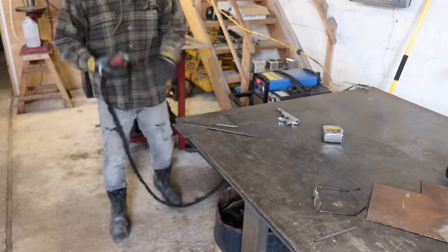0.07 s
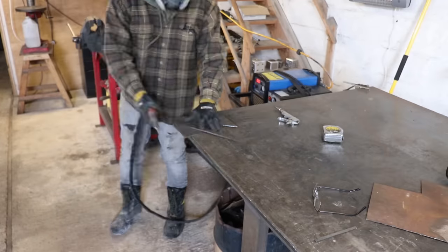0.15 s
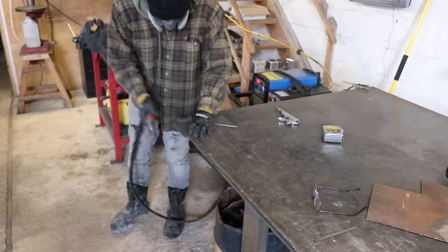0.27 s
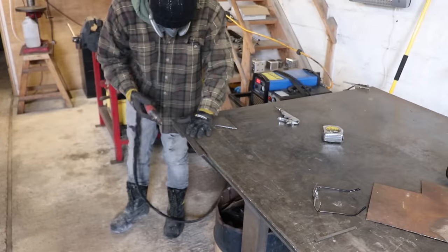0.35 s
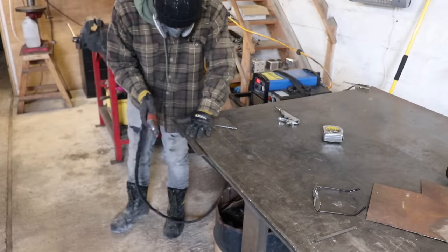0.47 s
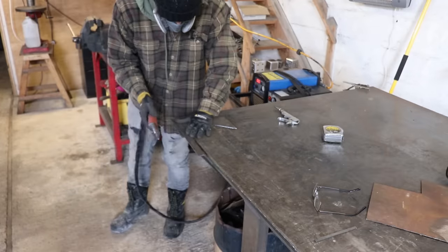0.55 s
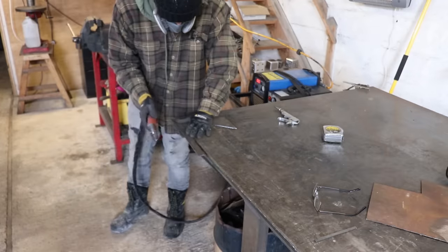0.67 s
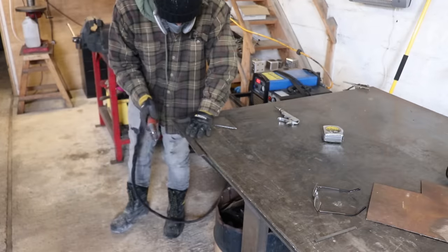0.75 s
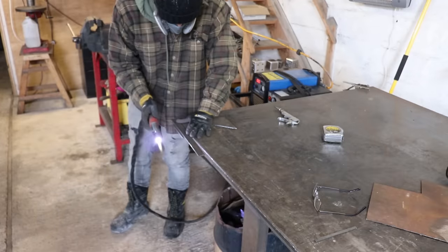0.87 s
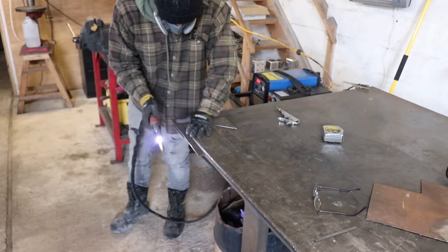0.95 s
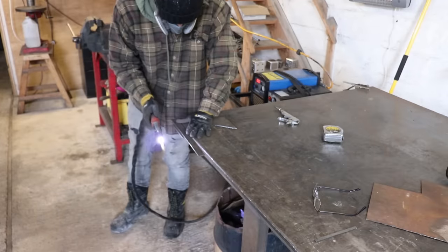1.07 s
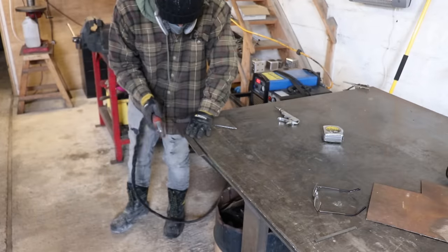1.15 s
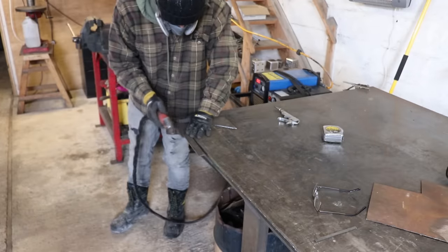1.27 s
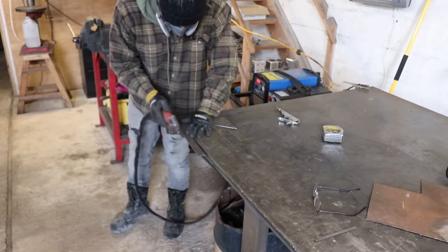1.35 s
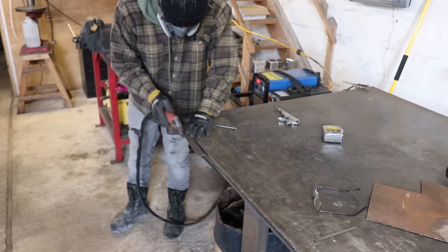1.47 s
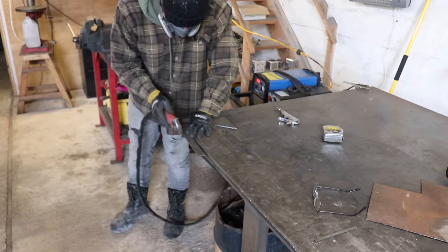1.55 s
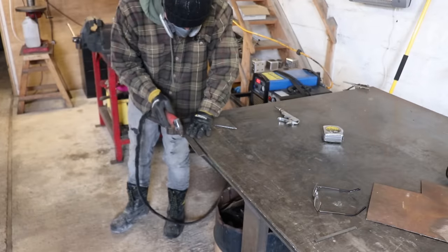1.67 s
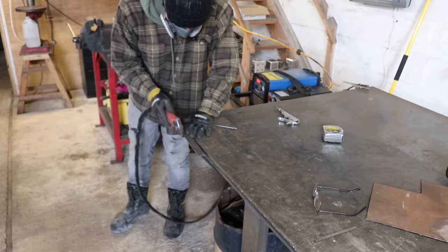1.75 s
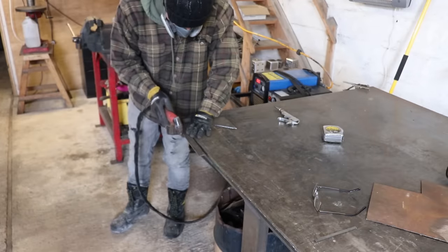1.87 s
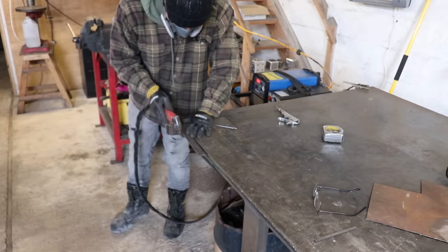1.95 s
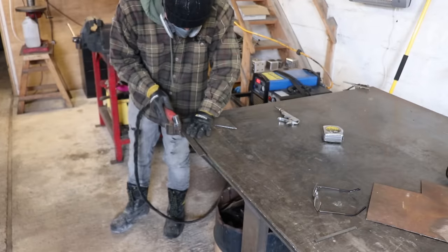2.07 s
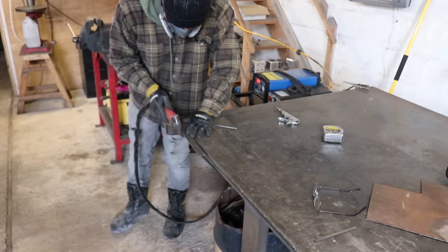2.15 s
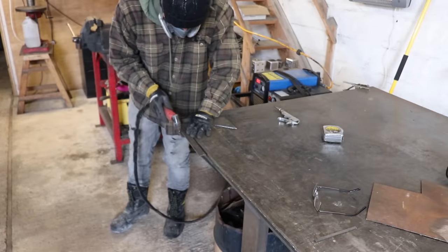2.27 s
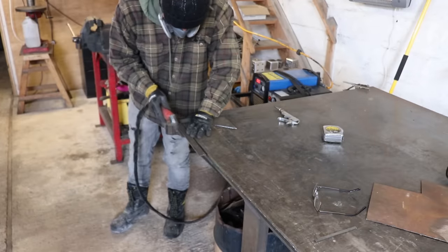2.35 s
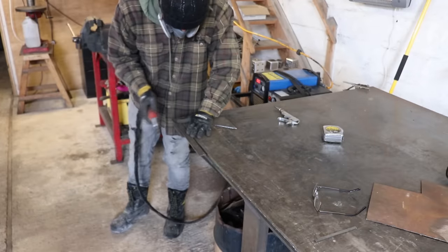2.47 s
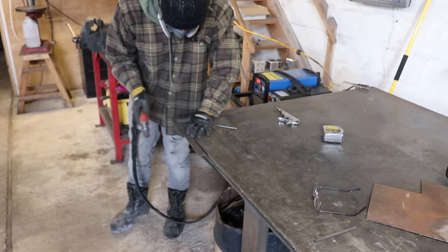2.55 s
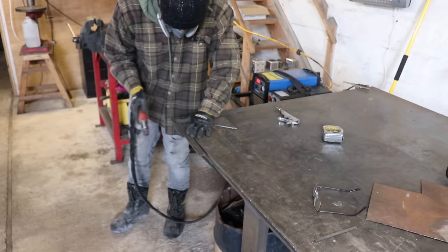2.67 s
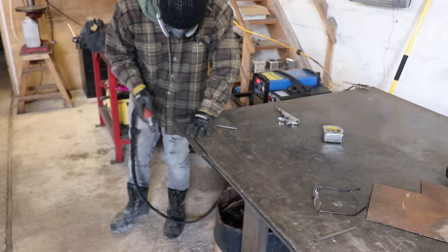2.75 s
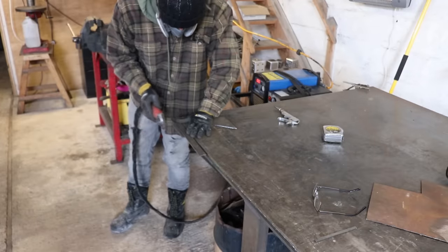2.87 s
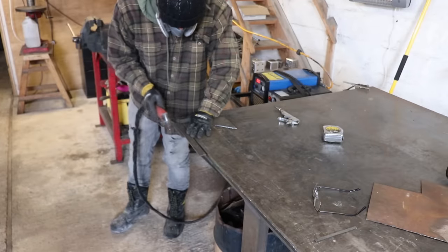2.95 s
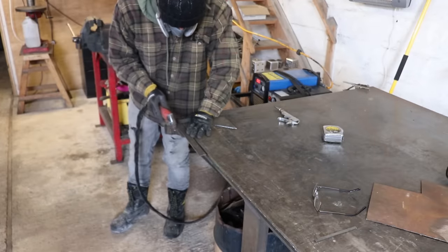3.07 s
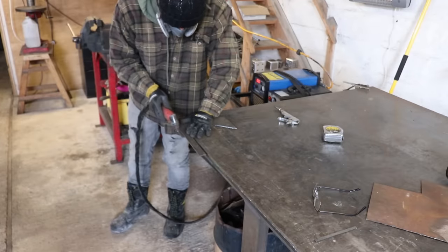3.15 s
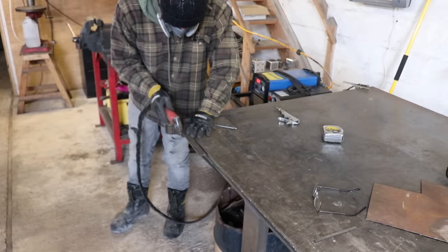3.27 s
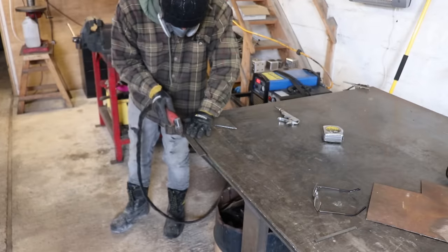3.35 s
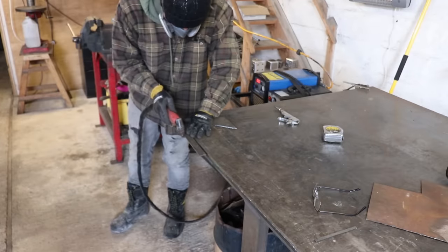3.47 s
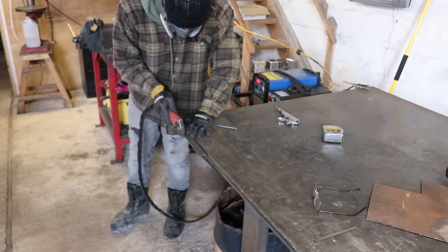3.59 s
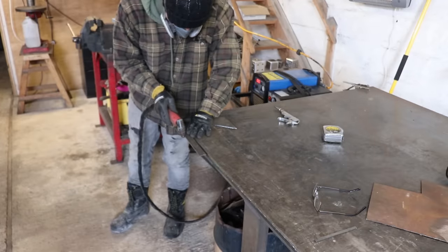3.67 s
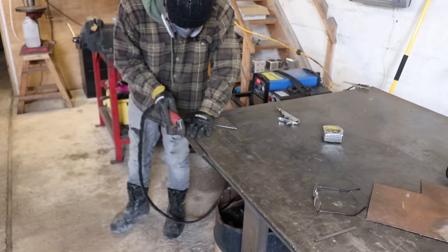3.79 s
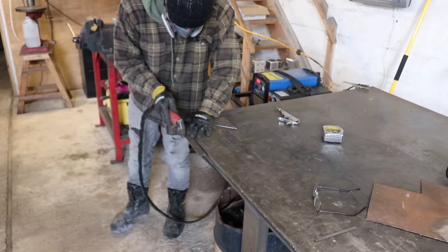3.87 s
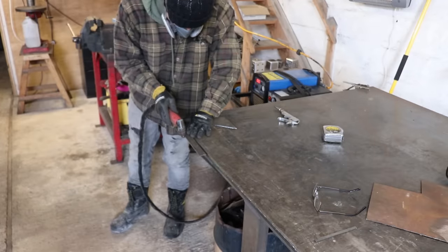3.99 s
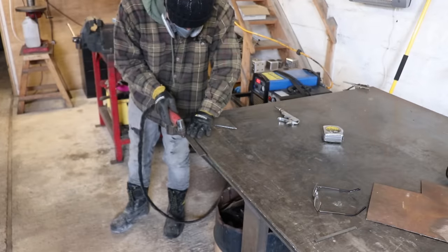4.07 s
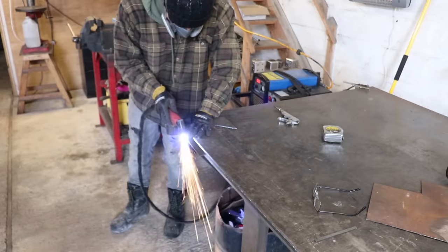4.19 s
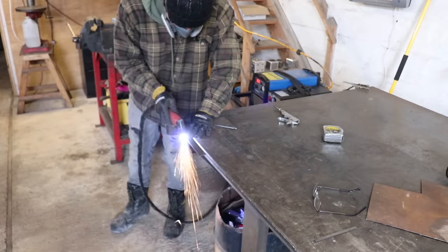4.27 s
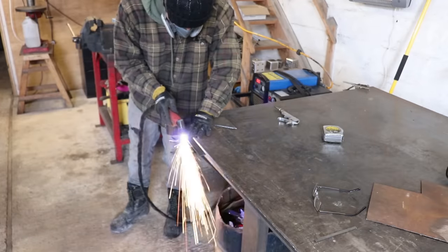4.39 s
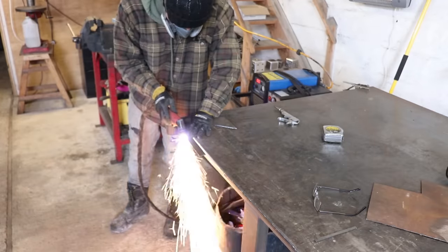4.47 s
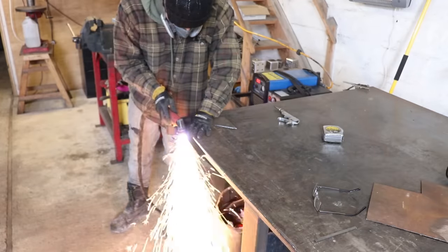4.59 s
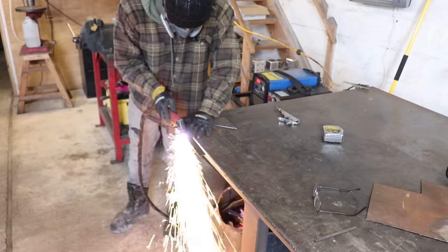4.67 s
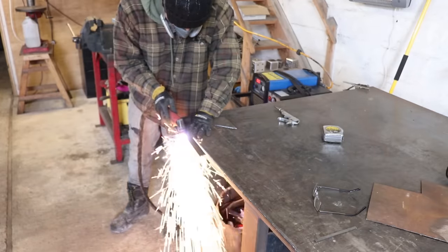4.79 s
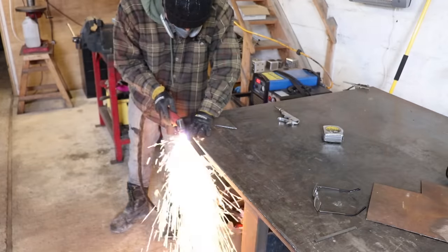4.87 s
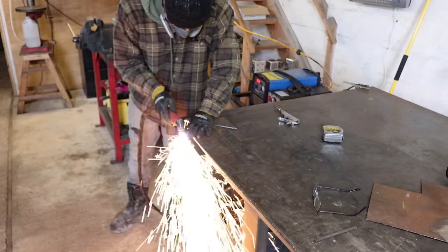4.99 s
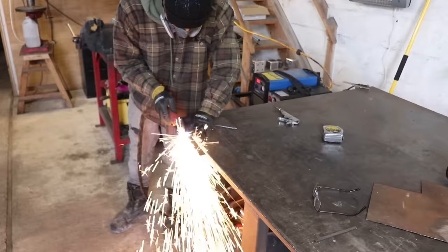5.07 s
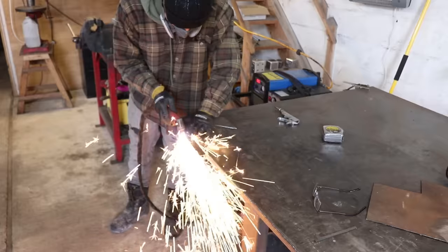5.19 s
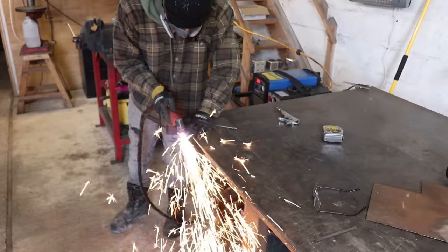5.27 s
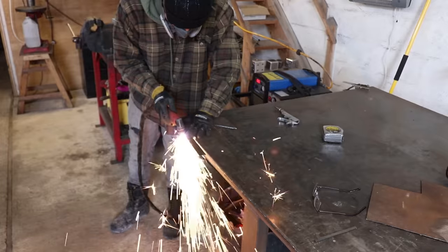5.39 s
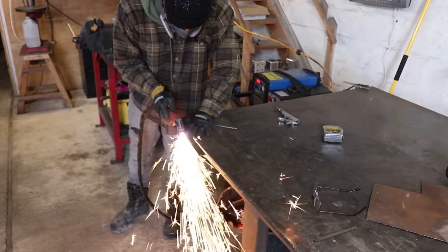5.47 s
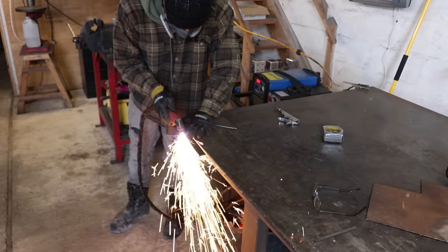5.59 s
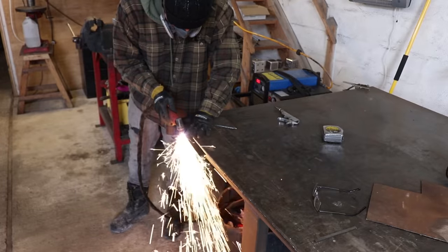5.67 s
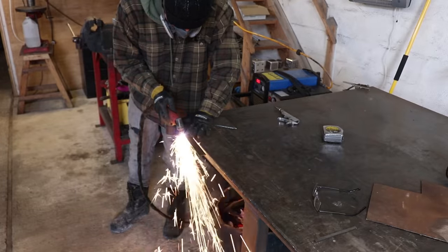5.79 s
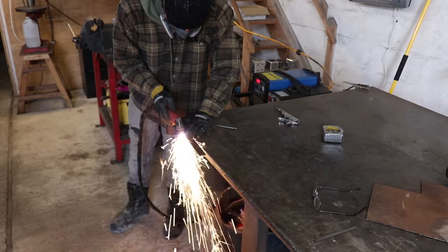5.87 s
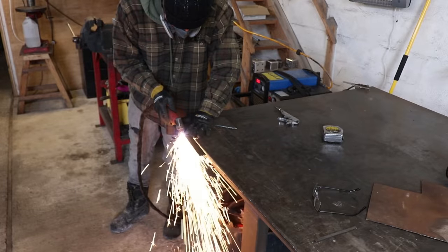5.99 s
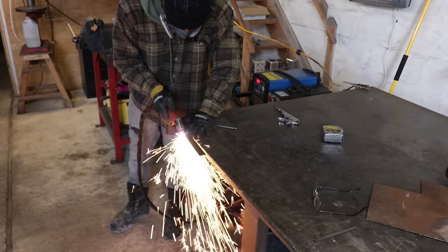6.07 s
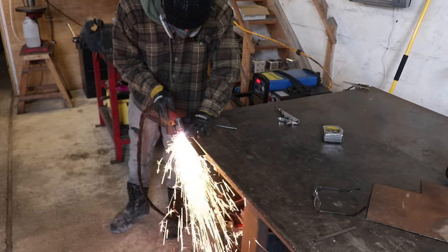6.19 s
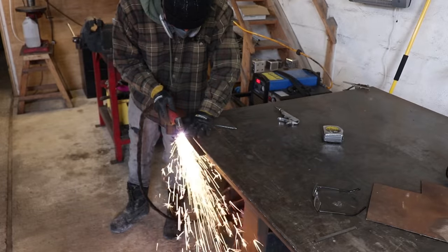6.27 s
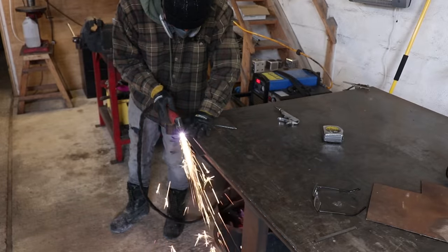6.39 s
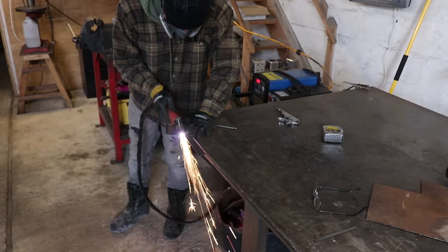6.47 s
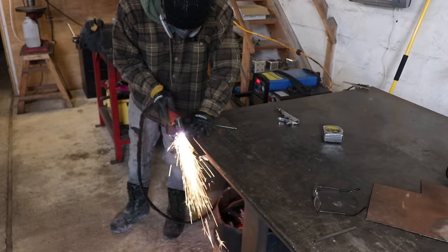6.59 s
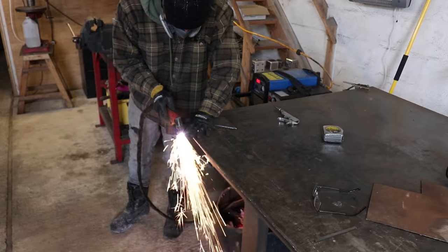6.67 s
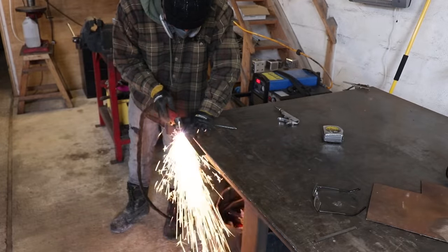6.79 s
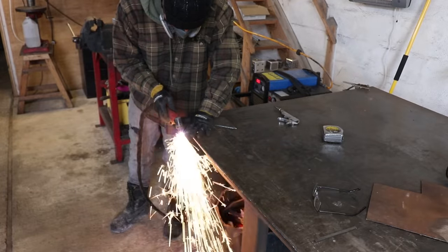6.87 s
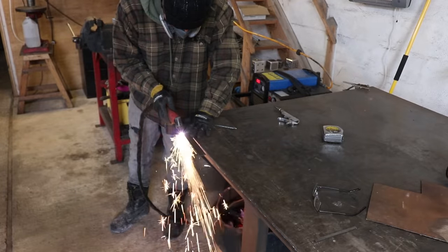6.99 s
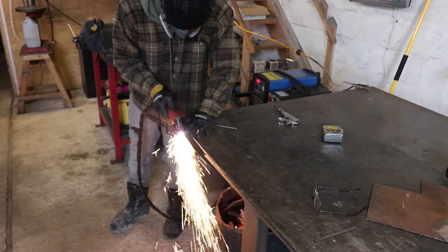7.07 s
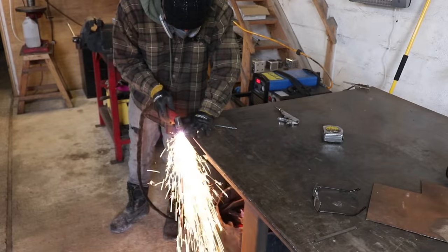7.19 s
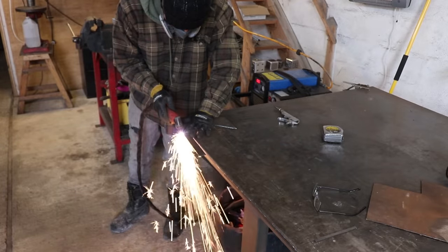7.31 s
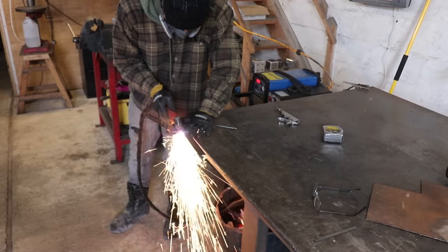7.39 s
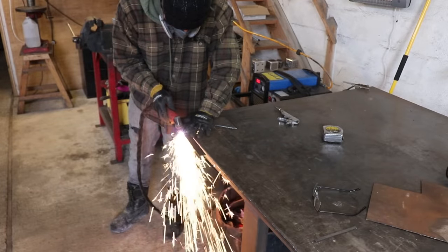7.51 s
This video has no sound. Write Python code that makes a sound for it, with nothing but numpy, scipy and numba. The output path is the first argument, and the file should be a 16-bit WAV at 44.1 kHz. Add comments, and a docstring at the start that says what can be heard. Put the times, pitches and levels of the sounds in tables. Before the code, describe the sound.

Sped-up workshop whine and scrapes, then a valve clack, hissing torch air, a brief pilot arc, and finally a roaring, sizzling plasma cut through steel.

```python
"""Plasma torch in a workshop

A valve clacks and lets air blow through the torch; a pilot arc strikes and drops out; later the arc cuts steel.
The jet is noise in resonant bands, the arc is pressure steps with crackle, the valve is struck ringing modes.
Table top and floor return early echoes, the room a noise tail. Fan noise, hum and tones lie beneath; in the
first moment the hum and tones run nine times as fast, with scraping and soft knocks. A gain control holds the
level and sinks the fan under the torch. Both channels carry the sound of one microphone."""
import sys
import numpy as np
from scipy import signal
from scipy.fft import rfft, irfft, next_fast_len
from scipy.io import wavfile
from scipy.ndimage import uniform_filter1d
from numba import njit

SR = 44100
rng = np.random.default_rng(int(sys.argv[2]) if len(sys.argv) > 2 else 0)


def log_audio(samples):
    """Write samples as a 16-bit WAV file to the path given in sys.argv[1]."""
    # one column per channel
    frames = np.atleast_2d(samples).T
    # limit to full scale, then quantise
    limited = np.clip(frames, -1, 1)
    pcm = np.round(limited * 32767).astype(np.int16)
    wavfile.write(sys.argv[1], SR, pcm)


N = 332514
VALVE_S, PILOT_ON_S, PILOT_OFF_S = .7925, .9155, 1.2146


def undb(db):
    """Level in dB to amplitude ratio: 20 dB is a factor of ten."""
    return 10 ** (np.asarray(db) / 20)


def unit(x):
    """Normalise the mean power, giving rms 1."""
    return x / np.sqrt(np.mean(x ** 2))


def curve(rows):
    """Linear interpolation of a table's columns over time, one value per sample."""
    s, *columns = np.transpose(rows)
    return [np.interp(np.arange(N) / SR, s, c) for c in columns]


@njit
def svf(x, hz, width_hz):
    """Second-order resonance: a state-variable band-pass whose centre may move."""
    y, b, l = np.empty(len(x)), 0., 0.
    for i in range(len(x)):
        g, k = np.tan(np.pi * hz[i] / SR), width_hz / hz[i]
        v = (b + g * (x[i] - l)) / (1 + g * (g + k))
        b, l, y[i] = 2 * v - b, l + 2 * g * v, k * v
    return y


def band(hz, width_hz):
    """Resonant filtering of white noise: the same resonance twice in series, rms 1."""
    hz = np.clip(hz * np.ones(N), 50, .45 * SR)
    once = svf(rng.standard_normal(N), hz, 1. * width_hz)
    return unit(svf(once, hz, 1. * width_hz))


def coloured(points):
    """Spectral shaping: white noise weighted by a curve through (f, level) points, rms 1."""
    hz, db = np.transpose(points)
    size = next_fast_len(N)
    bin_hz = np.arange(size // 2 + 1) * SR / size
    shape = undb(np.interp(np.log(bin_hz + 1), np.log(hz), db))
    return unit(irfft(rfft(rng.standard_normal(size)) * shape, size)[:N])


def walk(rate):
    """Slow random modulation: normal values held 1 / rate s, smoothed by two running means."""
    k = int(SR / rate)
    held = np.repeat(rng.standard_normal(N // k + 1), k)
    return uniform_filter1d(uniform_filter1d(held, k), k)[:N]


def jet():
    """Turbulent jet noise: hiss and flickering bands that change as the jet meets the plate and cuts it."""
    # how the torch is held: t/s, jet on the plate (0-1), arc biting into steel (0-1),
    # hollow sound under the table/dB re the hiss, sizzle/dB, splash/dB
    torch_path = [(.9, 0.4, 0.06, -23, 0, -0.5), (.92, .8, 0.1, -20, 1.5, 0.5),
                  (1.21, 0.82, .25, -18, 2.5, -1), (1.23, 0.8, 0.1, -17, -2, 0.5),
                  (1.43, 0.12, 0.03, -23, 2, 0), (1.52, 0.84, 0, -24, -1, 2),
                  (1.72, 0.55, 0, -35, 0.5, 0.5), (2.0, 0.68, 0.12, -35, -1, 0),
                  (2.42, 0.51, 0.14, -36, 0, 0), (2.47, 0.08, 0, -21, 3, 1.5),
                  (2.85, 0.02, 0.08, -27, -1, 0), (3.18, .01, 0.1, -24.5, 1.5, -1),
                  (3.21, 0.6, 0, -17, 1, 0.5), (3.3, 0.7, .02, -23, 0, 0), (3.5, 0.57, 0.07, -31, 0, 1.5),
                  (3.88, 0.8, 0.18, -17, -2.5, 0), (4.22, 0.83, 0.22, -36, -1.5, -0.5),
                  (4.4, 1, 0.37, -29, -0.5, -1.5), (4.5, .95, 0.45, -16, -1, 0), (4.6, 1, 0.5, -6, 1, 1),
                  (4.68, .9, 0.58, -6.5, 0.5, 0.5), (4.75, 0.75, 0.62, -9, 2.5, 1),
                  (4.87, 0.9, 0.7, -5.5, 0, 0.5), (4.97, 0.8, 0.67, -9.5, 1.5, -0.5),
                  (5.1, 0.6, 0.77, -14, 2, 1), (5.2, 0.43, 0.86, -19, 2.5, 1.5),
                  (5.35, 0.38, 1, -17, 0, -0.5), (5.45, 0.54, 0.8, -12, 0, 0.5),
                  (5.78, 0.5, .95, -15.5, 2, -0.5), (5.9, .6, 0.9, -13, -1, 0),
                  (6.06, 0.46, 1, -15, 3.5, 0.5), (6.22, 0.45, 1, -20, 0, 0),
                  (6.55, 0.7, 0.7, -15.5, -1.5, -1), (6.9, 0.77, 0.75, -13, -0.5, -1),
                  (7.05, 0.56, 0.68, -18.5, 0.5, 0), (7.35, 0.46, .78, -17, 1, 0),
                  (7.54, 0.56, 0.9, -18, -2, -0.5)]
    # roar, splash, overtone, sizzle: f/Hz, width/Hz, flicker scale/dB, flicker rate/(1/s),
    # level in free air/dB, added on the plate/dB, added by the cut/dB
    jet_bands = [(1190, 2200, 1.5, 12, -27, 10, 8), (3066, 3370, 1.4, 12, -20.5, 13, 10.5),
                 (8900, 7500, 1.5, 9.3, -13.5, 4.5, 6.5), (13240, 12800, 1, 10, -17, 6, 15)]
    # resonances of the hollow under the table: f/Hz, width/Hz, level/dB
    hollow_modes = [(566.6, 104, 1.5), (815, 60, -6), (1075, 120, -0.5), (1267, 50, -4)]
    # growls and spits as the jet crosses the plate edge: t/s, level/dB re the hiss, f/Hz, length/s
    edge_crossings = [(1.56, -10, 1250, 0.076), (3.19, -11, 800, 0.084), (3.29, -6, 3300, .07),
                      (3.45, -3, 3100, .015), (3.803, -18, 950, 0.052)]
    plate, bite, hollow_db, sizzle_db, splash_db = curve(torch_path)
    t = np.arange(N) / SR
    pilot = (t > PILOT_ON_S) & (t < PILOT_OFF_S)

    hiss_db = -10 + 4 * plate + 5 * bite
    hiss_hz = 5346 - 400 * plate  # the centre sinks on the plate
    pilot_hiss_db = 1  # the pilot arc sharpens the hiss
    out = band(hiss_hz, 3440) * undb(hiss_db + pilot_hiss_db * pilot + .98 * walk(10))

    drift = .015 * walk(3)  # shared by the four bands
    own_levels_db = [0, splash_db, 0, sizzle_db]
    for row, own_db in zip(jet_bands, own_levels_db):
        hz, width_hz, flicker_db, rate, db, plate_db, cut_db = row
        level_db = db + own_db + plate_db * plate + cut_db * bite
        out = out + band(hz * (1 + drift), width_hz) * undb(level_db + flicker_db * walk(rate))

    hollow = unit(sum(undb(db) * band(hz, w) for hz, w, db in hollow_modes))
    out = out + hollow * undb(hiss_db + hollow_db + 1.5 * walk(12))
    for s, db, hz, length_s in edge_crossings:
        envelope = np.exp(-((t - s) / length_s) ** 2)
        out = out + band(hz, 940) * undb(hiss_db + db) * envelope

    # breathy nozzle whistle re the hiss: weaker on the plate and in the cut
    whistle_db = -8.5 - 22 * plate - 15 * bite
    out = out + band(9370, 860) * undb(hiss_db + whistle_db)
    return flow() * out


def flow():
    """Source strength of the jet: air builds up after the valve, the pilot arc adds to it."""
    rise_s, low_db, swell_s, pilot_db = .078, -7, .27, 7
    t = np.arange(N) / SR
    rise = 1 - np.exp(-(np.maximum(t - VALVE_S, 0) / rise_s) ** 2)
    # held low until the pilot arc has gone out, then swelling to full
    held_db = low_db * np.exp(-(np.maximum(t - PILOT_OFF_S, 0) / swell_s) ** 2)
    pilot = (t > PILOT_ON_S) & (t < PILOT_OFF_S)
    return rise * undb(held_db + pilot_db * pilot)


def resonant_air(air):
    """Resonant colouration: band-passed copies of the jet join it, each surging by itself."""
    # f/Hz, width/Hz, added gain while air blows, added gain while the arc cuts
    resonances = [(884, 27, 0.92, 0.58), (1162, 55, 0.94, 0.15), (1375, 41, 0.63, 0.29),
                  (2260, 470, -0.0059, -0.066), (2660, 56, -0.14, 0.21), (3260, 290, 0.29, 0.52),
                  (3600, 210, 0.35, 0.21), (4370, 150, 0.22, -0.13), (5400, 230, 0.23, -0.017),
                  (7100, 280, 0.078, -0.22), (9650, 440, 0.25, -0.26), (10880, 640, 0.25, 0.61),
                  (13100, 1000, 0.000078, 0.17)]
    cut_s, surge = 4.24, .6
    wander = 1 + .011 * walk(2)  # the resonances shift as the torch is tilted
    cutting = np.arange(N) / SR > cut_s
    out = air
    for hz, width_hz, blow_gain, cut_gain in resonances:
        gain = np.where(cutting, cut_gain, blow_gain) * (1 + surge * walk(3.98))
        out = out + gain * svf(air, hz * wander, 1. * width_hz)
    return out


def arc():
    """Thermal expansion: sudden heating gives a pressure step that swings back, and a burst of crackle."""
    # strikes and drop-out: t/s, signed step size, step length/ms, crackle level/dB, crackle length/ms
    arc_events = [(0.9159, -1.3, 0.16, -2, 7.5), (1.21465, 8, 0.05, -3, 1.5), (4.2408, -12, 0.042, 1, 3.5)]
    out = np.zeros(N)
    crackle = unit(band(3760, 3600) + band(10300, 6900) + .5 * band(690, 2100))
    for s, peak, step_ms, crackle_db, crackle_ms in arc_events:
        ms = (np.arange(N) / SR - s) * 1000
        u = np.maximum(ms, 0) / step_ms
        swing_back = .047 * u * np.exp(-u / 9)
        step = np.e * u * np.exp(-u) - swing_back
        burst = (ms > 0) * np.exp(-(np.maximum(ms, 0) / crackle_ms) ** 3)
        out += peak * step + undb(crackle_db) * burst * crackle
    return out


def valve():
    """Impact excitation of modes: the solenoid armature rattles to rest, its housing rings, air puffs out."""
    # housing modes: f/Hz, level/dB, t60/s
    housing_modes = [(1700, -4, 0.034), (2230, -8, 0.053), (2600, -20, 0.033), (3960, 2, 0.013),
                     (5100, -6, .015), (6400, -8, .012), (7950, -12, .008), (10300, 1, 0.0055),
                     (13200, -13, 0.0034)]
    clack_db, puff_db, puff_s = -8, -13.5, .032
    t = np.maximum(np.arange(N) / SR - VALVE_S, 0)
    ring = 0
    for hz, db, t60 in housing_modes:
        ring = ring + undb(db) * np.sin(2 * np.pi * hz * t) * 1000 ** (-t / t60)
    ms = np.arange(SR // 40) * 1000 / SR
    rattle = .058 * rng.standard_normal(len(ms)) * np.exp(-ms / 6)
    for at_ms, size in [(0, .2), (1.2, 1), (4.5, .28), (9, .22)]:  # impacts
        rattle[int(at_ms * SR / 1000)] += size
    puff = (t > 0) * np.exp(-t / puff_s) * band(3630, 6500)
    clack = signal.fftconvolve(ring, rattle)[:N] * undb(clack_db) + puff * undb(puff_db)
    # too small a source to sound low
    return signal.sosfilt(signal.butter(3, 1100, "high", fs=SR, output="sos"), clack)


def echoes(torch, strikes):
    """Early reflections: delayed copies dulled in the treble, and one undulled copy of the strikes."""
    # table top, then floor: delay/ms, gain
    reflections = [(.75, 0.02), (3.9, 0.13)]
    dull_hz, strike_gain = 5400, .36
    dull = signal.sosfilt(signal.butter(1, dull_hz, fs=SR, output="sos"), torch)
    out = np.zeros(N)
    for ms, gain in reflections:
        out = out + gain * np.pad(dull, (int(ms * SR / 1000), 0))[:N]
    floor_delay = int(reflections[-1][0] * SR / 1000)
    # the strikes point at the floor
    return out + strike_gain * np.pad(strikes, (floor_delay, 0))[:N]


def room(air, strikes, clack):
    """Diffuse reverberation: convolution with exponentially decaying noise."""
    t60_s, hits_db, jet_db, sway_ms = .19, -9, -12, .1
    # the hand sways, so the jet's path lengths change
    sway = sway_ms * SR / 1000 * walk(1.506)
    moved = np.interp(np.arange(N) + sway, np.arange(N), air)
    t = np.arange(SR // 2) / SR
    tail = rng.standard_normal(len(t)) * 1000 ** (-t / t60_s) * (t > .006)
    tail = tail / np.sqrt(np.sum(tail ** 2))
    sent = undb(hits_db) * (clack + strikes) + undb(jet_db) * moved
    return signal.fftconvolve(sent, tail)[:N]


def scrape():
    """Friction noise: a roughly flickering resonant sound shaped into short strokes."""
    # strokes: t/s, level/dB, length/ms
    scrape_strokes = [(.178, -27, 5), (.21, -18.5, 21), (.247, -21, 17), (.278, -30, 14), (.375, -32.5, 14)]
    # scraped resonances: f/Hz, width/Hz, level/dB
    scrape_modes = [(7150, 1000, -3.5), (8800, 3400, -5), (11100, 1000, -2), (12600, 4100, 0),
                    (15300, 2000, -10)]
    t = np.arange(N) / SR
    rough = unit(sum(undb(db) * band(hz, w) for hz, w, db in scrape_modes)) * undb(3.2 * walk(247.5))
    strokes = sum(undb(db) * np.exp(-((t - s) * 1000 / ms) ** 2) for s, db, ms in scrape_strokes)
    return rough * strokes


def knocks():
    """Damped soft impacts: short dull noise bursts, each round one pitch."""
    # t/s, level/dB, f/Hz, length/ms
    soft_knocks = [(.08, -44, 940, 4), (.12, -43, 860, 9.8), (.152, -46, 700, 5), (.235, -53, 600, 10),
                   (.38, -42, 1320, 8)]
    t = np.arange(N) / SR
    out = 0
    for s, db, hz, ms in soft_knocks:
        out = out + undb(db) * band(hz, .5 * hz) * np.exp(-((t - s) * 1000 / ms) ** 2)
    return out


def fan():
    """Broadband flow noise with wavering mains hum and fan tones, first sped up, then at normal speed."""
    # noise spectrum at normal speed: f/Hz, level per Hz/dB
    noise_normal = [(30, -26), (70, -25), (94, -17), (125, -19), (170, -16), (222, -4.5), (270, -7),
                    (310, -8), (400, -14), (545, -12), (780, -15), (1000, -13.5), (1500, -15.5),
                    (1900, -19), (2300, -22.5), (2700, -21), (3400, -18.5), (4200, -25), (6000, -33),
                    (15500, -57)]
    # noise spectrum when sped up: f/Hz, level per Hz/dB
    noise_fast = [(100, -57), (420, -43), (1150, -32.5), (1300, -23.5), (1700, -22.5), (1950, -13),
                  (2330, -13), (2800, -19), (3200, -18), (3600, -21), (3900, -23), (4300, -19.5),
                  (5000, -17.5), (5500, -20), (5830, -22), (6200, -21), (7700, -26), (9000, -21),
                  (15500, -26)]
    # hum and whirr: f at normal speed/Hz, level re the noise/dB, level re the noise when sped up/dB
    fan_tones = [(49.5, -40, -33), (100, -37, -33), (258.5, -26, -16), (300.2, -24, -19), (331.5, -11, -11),
                 (347.5, -28, -21), (663.2, -18, -21), (789, -30, -21), (994.7, -16, -15),
                 (1262.7, -30, -21), (1359.6, -30, -23), (1498.3, -30, -24)]
    fast_end_s, speed_up, normal_db, fast_db = .585, 9, -28, -28.5
    fast = np.arange(N) / SR < fast_end_s
    speed = np.where(fast, speed_up, 1) * (1 + .003 * walk(30))
    elapsed = np.cumsum(speed) / SR
    out = np.where(fast, coloured(noise_fast), coloured(noise_normal))
    for hz, tone_db, fast_tone_db in fan_tones:
        tone = np.sqrt(2) * np.sin(2 * np.pi * (hz * elapsed + rng.random()))
        out = out + tone * undb(np.where(fast, fast_tone_db, tone_db) + 2.5 * walk(60))
    return out * undb(np.where(fast, fast_db, normal_db))


def gain_control(x):
    """Feedforward compression: turns down whatever lies above the held level, fast down and slowly up."""
    hold_db, smooth_s, release_s, lag_s = -15.5, .0079, .063, .003
    hop = SR // 500  # one step about every 2 ms
    heard = x + .25 * np.diff(x, prepend=0)  # treble counts a little more
    smooth = 1 - np.exp(-1 / (SR * smooth_s))
    power = signal.lfilter([smooth], [1, smooth - 1], heard ** 2)[::hop]
    over_db = 10 * np.log10(power + 1e-12) - hold_db
    cut_db, back = [0.], 1 - np.exp(-hop / (SR * release_s))
    for db in np.maximum(over_db, 0):
        share = .5 if db > cut_db[-1] else back
        cut_db.append(cut_db[-1] + (db - cut_db[-1]) * share)
    late_steps = (np.arange(N) - lag_s * SR) / hop  # the control answers late
    return undb(-np.interp(late_steps, np.arange(len(cut_db)), cut_db))


def scene():
    """Superposition: torch, echoes, valve, room tail, fan, scrape and knocks, alike on both channels."""
    strikes, clack = arc(), valve()
    air = resonant_air(jet())
    torch = air + strikes
    near = torch + echoes(torch, strikes) + clack
    mono = near + room(air, strikes, clack) + fan() + scrape() + knocks()
    return np.array([mono, mono])


def record(dry):
    """Band limiting and level control: bass loss below 40 Hz, held level, clipped peaks, top cut away."""
    top_hz, clip_level = 15800, .95
    x = signal.sosfilt(signal.butter(1, 40, "high", fs=SR, output="sos"), dry)
    top_cut = signal.ellip(12, .3, 60, top_hz, fs=SR, output="sos")
    return signal.sosfilt(top_cut, np.clip(x * gain_control(x[0]), -clip_level, clip_level))


dry = scene()
out = record(dry)
log_audio(out)
```